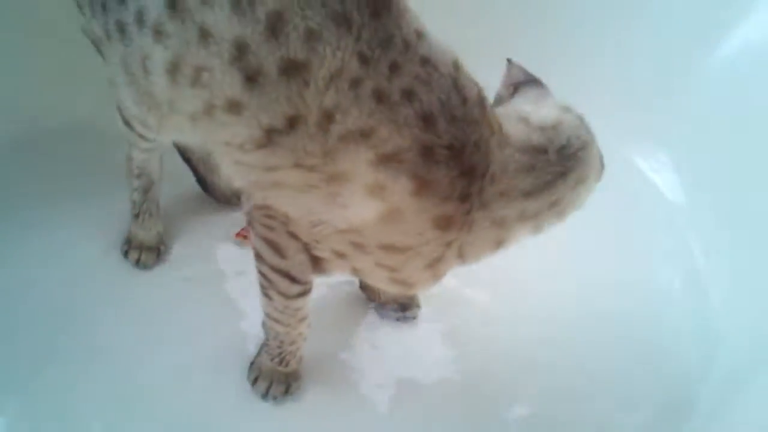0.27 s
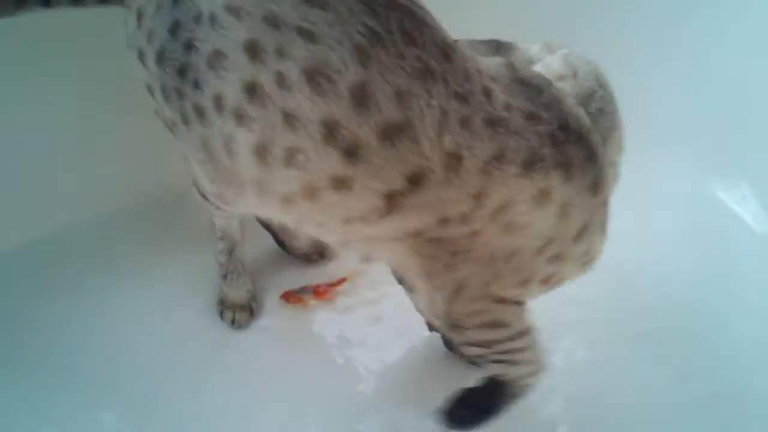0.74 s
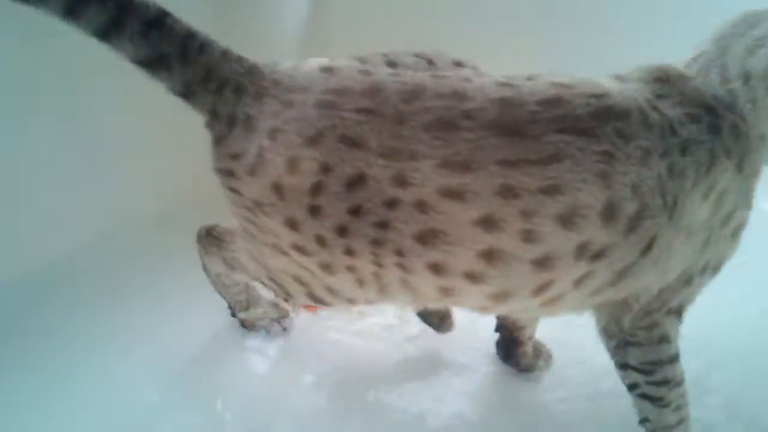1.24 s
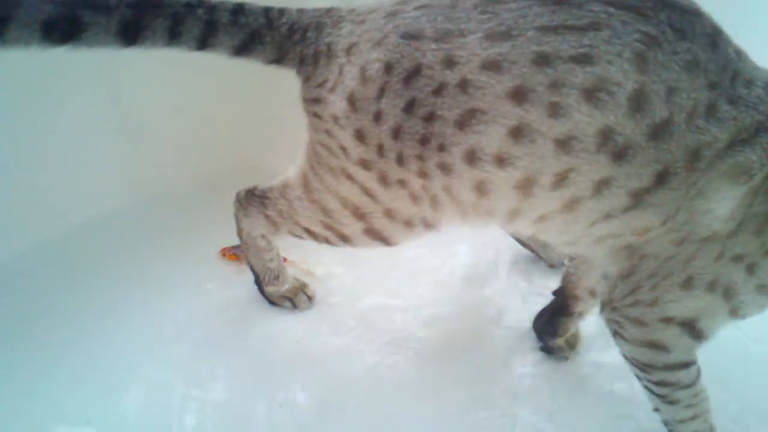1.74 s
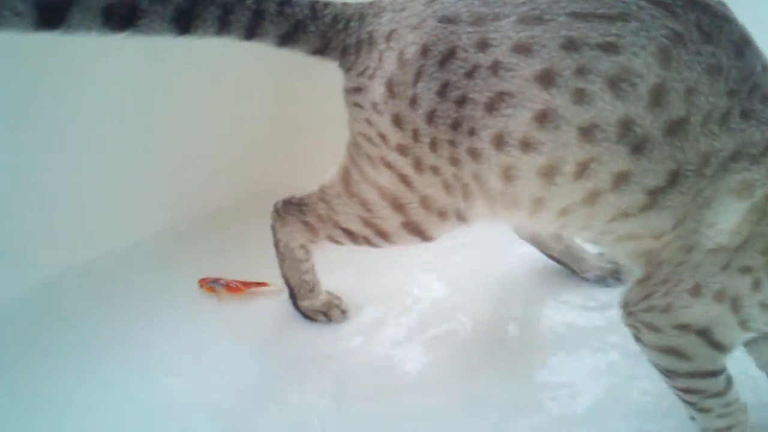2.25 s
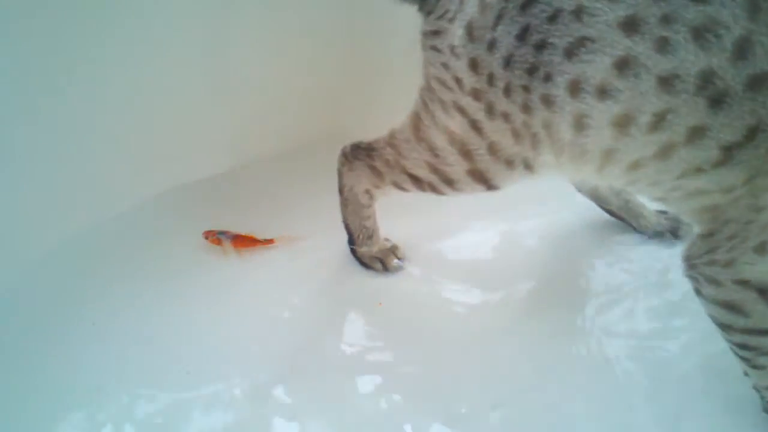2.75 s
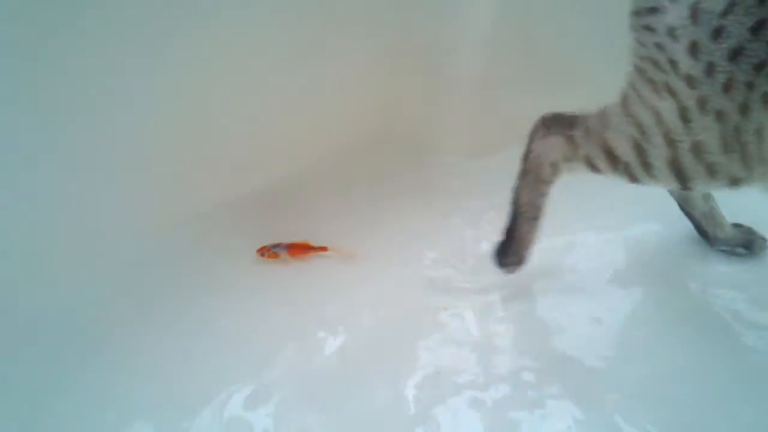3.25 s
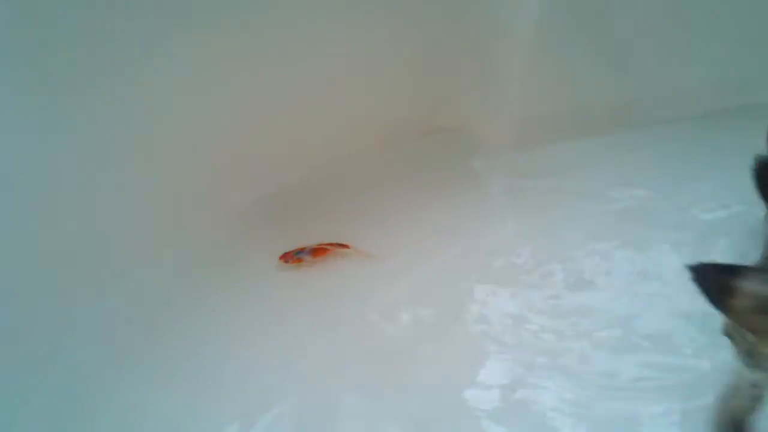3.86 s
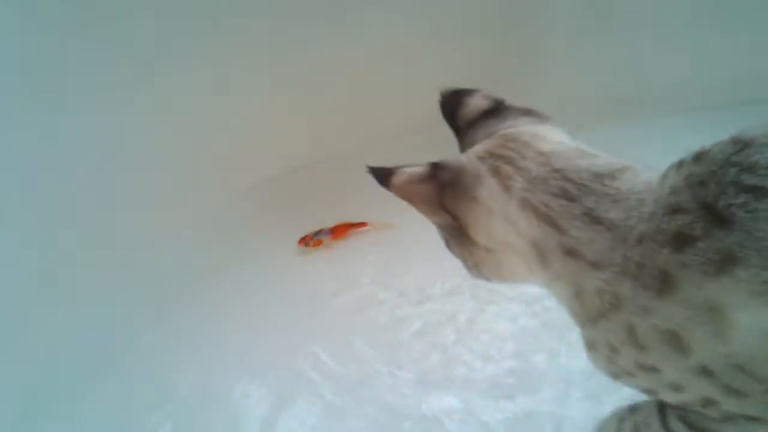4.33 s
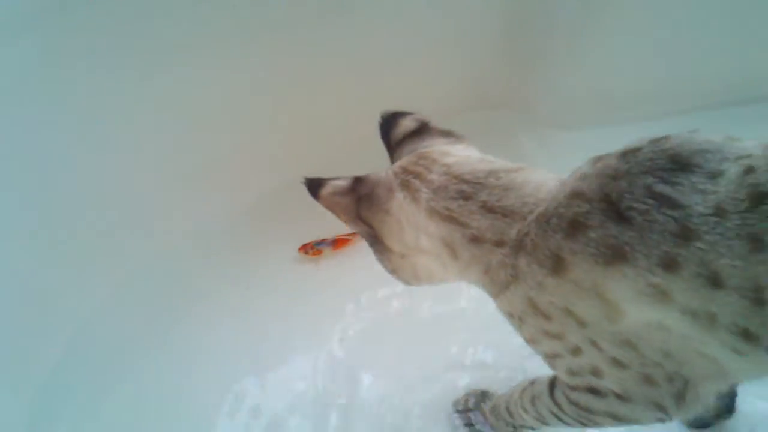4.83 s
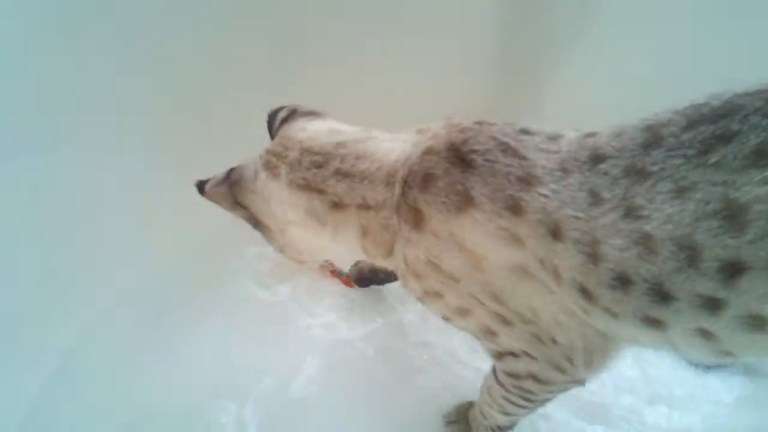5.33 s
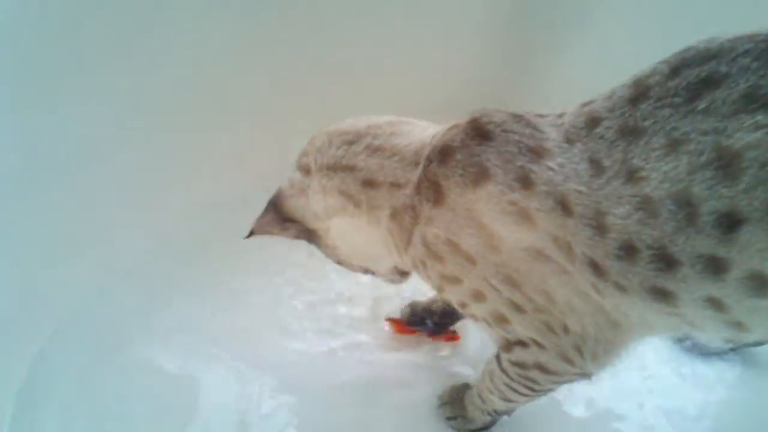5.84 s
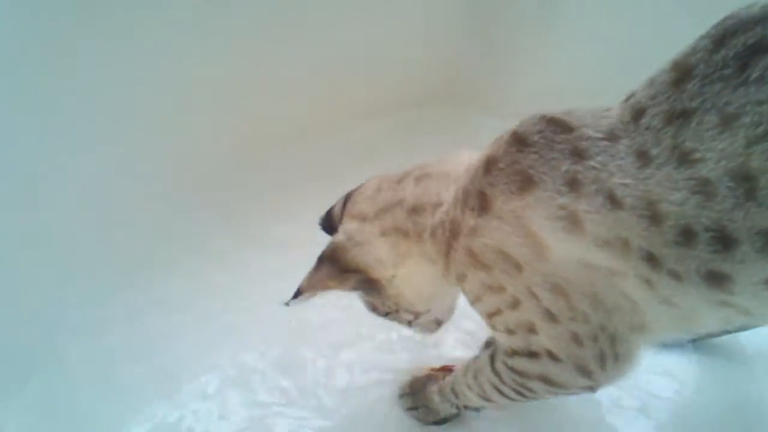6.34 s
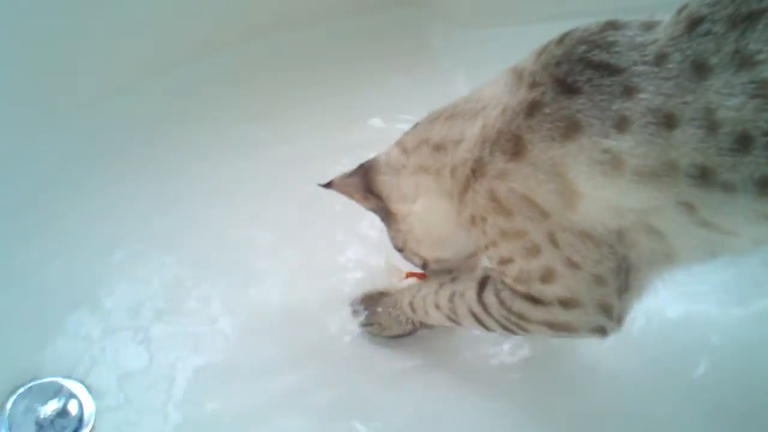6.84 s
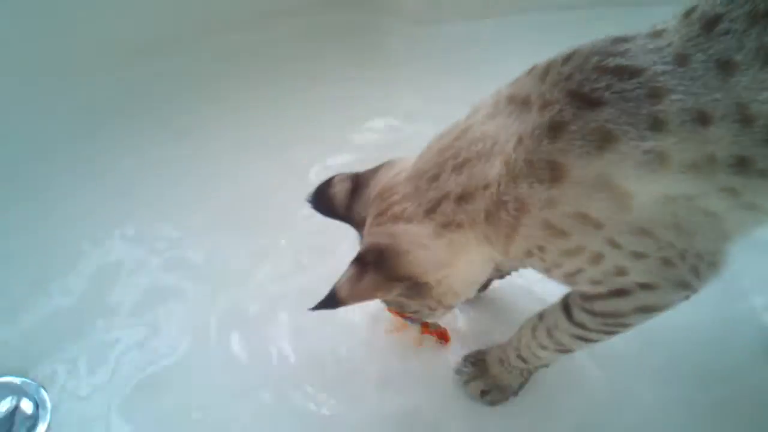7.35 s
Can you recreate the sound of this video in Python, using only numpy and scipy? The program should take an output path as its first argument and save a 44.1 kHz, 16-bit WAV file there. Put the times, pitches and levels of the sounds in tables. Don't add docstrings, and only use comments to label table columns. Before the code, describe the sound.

A cat steps through a finger of water in a bathtub, in a small echoing tiled bathroom with very soft rumble, hiss and fan hum. The first 0.9 seconds hold only faint low glugs and drips. From 0.9 to 1.5 comes the busiest splash: a wet push at 1.1, then loud hollow bubble pops around 1.2, with crisp spray and ticking drops at 1.35 and 1.45. It settles into gentle sloshing, with small drips and a light dab at 2.2 to 2.35. After a quiet gap, a little splash at 3.57 leads to plinks at 3.9, a sharp drop tick at 3.98 and a fuller slosh at 4.05, tapering through 4.4. Fine droplets patter around 5.2, then a clear plop rises in pitch at 5.4. Soft swishes follow at 5.7, 6.8 and 7.35. Water sits slightly left.

```python
import sys
import numpy as np
from scipy import signal
from scipy.fft import rfft, irfft, next_fast_len
from scipy.io import wavfile

SR = 44100
rng = np.random.default_rng(int(sys.argv[2]) if len(sys.argv) > 2 else 0)


def how_loud(loudness_db):
    steps = np.asarray(loudness_db, float) / 20
    return 10 ** steps


def store_wav(level_fs):
    pcm = np.round(np.clip(np.atleast_2d(level_fs), -1, 1) * 32767)
    wavfile.write(sys.argv[1], SR, pcm.T.astype(np.int16))


N = 334707


def noise(*shape):
    return rng.standard_normal(shape)


def band(x, lo_hz, hi_hz):
    sos = signal.butter(2, [lo_hz, min(hi_hz, SR / 2.2)], "band", fs=SR, output="sos")
    return signal.sosfilt(sos, x) * np.sqrt(SR / 2 / (hi_hz - lo_hz))


def sides(pan_db):
    return how_loud(np.array([[pan_db], [-pan_db]]) / 2)


def add(out, start_s, x):
    i = int(start_s * SR)
    out[:, i:i + x.shape[1]] += x[:, :N - i]


def ring(pitch_hz, cycles, glide, rise=0.39):
    turns = np.arange(int(5 * cycles * SR / pitch_hz) + 8) * pitch_hz / SR
    swell = (1 - np.exp(-turns / rise)) * np.exp(-2 * turns / cycles)
    return swell * np.sin(2 * np.pi * (turns + glide * turns ** 2 / (2 * cycles)))


# start_s, pitch_hz,
# peak_db, fade_ms
BUBBLES = [(0.146, 424, -50, 3), (.1465, 1000, -52, 1), (.1468, 1600, -55, 1), (.172, 350, -56, 5),
           (0.623, 450, -50, 2.5), (1.0962, 358, -52, 25), (5.399, 1480, -43, 9), (1.1975, 1133, -19.5, 2.6),
           (1.1998, 628, -42, 10), (1.2412, 975, -24.5, 2.5), (1.2646, 1116, -27, 3), (1.298, 1080, -39, 3.2),
           (1.3235, 1200, -38.5, 3.7), (1.3639, 440, -53, 5.7), (2.3244, 1240, -36, 2.35),
           (2.3327, 1176, -50, 12), (2.333, 850, -51, 5), (2.5634, 384, -51.5, 7.6), (2.975, 430, -64, 30),
           (3.9218, 1255, -41, 5.1), (4.024, 790, -42, 10), (4.0431, 590, -42, 12), (4.0445, 1220, -50, 2.1),
           (4.0546, 325, -33, 16), (4.0971, 350, -45.5, 29), (4.2299, 1190, -41, 2.5),
           (4.2308, 944, -44, 10.5), (4.4833, 1100, -47, 6.6), (4.546, 1098, -60, 8),
           (5.3074, 1217, -58.5, 24), (6.8114, 733, -45, 3.4), (6.8502, 734, -53, 4.5), (7.376, 680, -54, 1),
           (1.166, 1120, -50, 1.5), (1.183, 1050, -38, 1), (1.227, 1150, -33, 3), (1.311, 1150, -38, 2.5),
           (2.35, 1160, -58.5, 45), (2.334, 720, -54, 8), (3.575, 820, -52, 2), (4.12, 320, -46, 8),
           (4.235, 700, -60, 20), (4.308, 950, -59, 25), (4.325, 720, -52, 9), (6.817, 330, -52, 5)]
# start_s, pitch_hz, peak_db,
# fade_ms
MORE_BUBBLES = [(0.824, 1920, -57, 3.1), (0.9037, 2140, -49, 2.2), (1.0044, 1370, -48, 2.6),
                (1.0837, 1870, -45.5, 4.1), (1.173, 1560, -44, 2.3), (1.1915, 1500, -33, 2),
                (1.195, 1550, -26, 3), (1.222, 1520, -31, 3), (1.2099, 1560, -28.5, 6.2), (1.246, 1900, -25, 1.7),
                (1.4096, 1790, -51, 10), (1.5598, 2200, -54, 4.1), (2.321, 1840, -45, 1.1),
                (3.3719, 1825, -46, 4.8), (3.8217, 1450, -43.5, 1.4), (3.878, 1670, -58, 5.5),
                (3.9134, 1634, -36.5, 4), (3.9451, 1290, -46, 14), (4.029, 1760, -55, 6.9),
                (4.1035, 1900, -44, 2), (4.1072, 2150, -38, 2.8), (4.3676, 2200, -47.5, 12),
                (4.3789, 1310, -51, 4.8), (1.097, 1850, -47, 2.5), (4.9638, 2180, -56, 2.9),
                (5.1033, 1980, -50, 2), (5.236, 1590, -48, 2.2), (5.27, 1450, -49, 2), (6.798, 1546, -49.5, 7.2),
                (6.8259, 1530, -58, 11), (6.872, 1264, -55, 5.4), (6.8739, 1530, -50.5, 4.2),
                (6.904, 1640, -54, 22),
                (5.272, 4000, -60, 14), (5.232, 3250, -56, 8), (0.801, 3140, -56, 2.5), (1.105, 4000, -46, 3.5),
                 (1.5611, 2870, -53, 2.1), (2.2472, 4170, -56, 2.7), (2.2821, 3100, -57, 4.4),
                 (2.3229, 3600, -52, 1.5), (3.5567, 3410, -54, 2.4), (3.9053, 3140, -49, 1.5),
                 (4.103, 3920, -50, 3.3), (5.1086, 4000, -58, 2.5), (7.1272, 3840, -63, 3.1)]
# start_s, pitch_hz, peak_db, left_minus_right_db
SPECKS = [(0.9298, 3340, -52, 15), (0.958, 3200, -52.5, 17), (1.0015, 3500, -46, 6),
          (1.0984, 4200, -35.5, 4), (1.0986, 3480, -32, 8), (1.2033, 2800, -33, 8), (1.3462, 3300, -40, 15),
          (1.3713, 4380, -49, 6), (1.439, 2440, -38, 6), (1.4505, 3400, -44, 8), (2.1354, 3350, -53, 13),
          (2.2264, 4000, -49, 5), (2.227, 3020, -48, 18), (3.3774, 2380, -47.5, 14),
          (3.4562, 3010, -52, 17.5), (3.5733, 2670, -44, 11.5), (3.8561, 2640, -50, 13),
          (3.9072, 2400, -41, 6), (3.9845, 4320, -40, 21.5), (4.0765, 3140, -38.5, 14),
          (4.0766, 2440, -31, 6), (4.0764, 3960, -39, 13), (4.2389, 3710, -46, 13), (4.297, 3750, -46, 3),
          (4.3777, 3580, -51, 9), (5.2055, 3990, -49, 6), (5.2203, 3300, -43, 9), (5.268, 4470, -46, 5),
          (5.4015, 3150, -39, 3), (6.8742, 2430, -46, 9), (1.106, 3300, -42, 8), (1.118, 3700, -43, 8),
          (1.131, 4000, -44, 8), (2.247, 3600, -55, 8), (2.287, 3700, -56, 8), (2.3232, 3100, -54, 8),
          (2.3232, 4400, -56, 8), (3.8808, 3360, -54, 8), (3.8908, 3840, -52, 8), (3.9037, 4110, -50, 8),
          (3.9107, 4110, -48, 8), (4.3382, 3840, -53, 8), (5.391, 3200, -48, 6), (5.41, 3300, -46, 6)]


def bubbles():
    bubble_pan_db, more_bubble_pan_db, speck_fade_ms = 5.5, 8, 1.9
    rows = [(*row, bubble_pan_db) for row in BUBBLES]
    rows += [(*row, more_bubble_pan_db) for row in MORE_BUBBLES]
    rows += [(s, hz, db, speck_fade_ms, pan_db) for s, hz, db, pan_db in SPECKS]
    out = np.zeros((2, N))
    for start_s, pitch_hz, peak_db, fade_ms, pan_db in rows:
        cycles = max(fade_ms, 1) * pitch_hz / 500
        tone = ring(0.985 * pitch_hz, cycles, glide=0.06 * rng.random())
        add(out, start_s - 0.0012, how_loud(peak_db - 2.5) * sides(pan_db) * tone)
    return out


# start_s, pitch_hz, level_db
PLOP = [
    (5.3905, 570, -48),
    (5.391, 590, -26.5),
    (5.401, 627, -29.5),
    (5.41, 740, -26),
    (5.418, 860, -23.5),
    (5.427, 1008, -33.5),
    (5.438, 1190, -32.5),
    (5.441, 1250, -61),
]


def plop():
    pan_db, overtone_db = 4, -31
    start_s, pitch_hz, level_db = np.transpose(PLOP)
    t = np.arange(start_s[0], start_s[-1], 1 / SR)
    phase = 2 * np.pi * np.cumsum(np.interp(t, start_s, pitch_hz)) / SR
    tone = np.sin(phase) + how_loud(overtone_db) * np.sin(2 * phase)
    out = np.zeros((2, N))
    add(out, start_s[0], sides(pan_db) * how_loud(np.interp(t, start_s, level_db)) * tone)
    return out


def stroke(start_s, level_db, rise_s, fall_s):
    t = np.arange(0, N / SR, 0.001) - start_s
    return how_loud(level_db + 20 * np.minimum(t / rise_s, -t / fall_s))


def per_sample(levels):
    ms = np.arange(N) / SR * 1000
    return [np.interp(ms, np.arange(len(level)), level) for level in levels]


def grains(rate, spread_db, pitches_hz, cycles, patchy_db):
    out = 0
    knots = np.arange(0, N, 600)
    for pitch_hz in pitches_hz:
        place, size = rng.random((2, int(2 * rate * N / SR)))
        kicks = np.zeros(2 * N)
        kicks[(place * 2 * N).astype(int)] = how_loud(spread_db * np.minimum(-np.log(size), 3))
        clumps = np.interp(np.arange(N), knots, noise(len(knots)))
        kicks = kicks.reshape(2, N) * how_loud(patchy_db * clumps)
        rung = signal.oaconvolve(kicks, ring(pitch_hz, cycles, 0.19)[None], axes=1)[:, :N]
        out = out + rung * np.sqrt(pitch_hz)
    return out / np.std(out)


# start_s (moment of the peak), spray_db, rise_s, fall_s, fizz_over_spray_db (times per
# 20 dB)
FLINGS = [(0.006, -82, .005, 1.2, 10), (0.922, -65, .15, .3, 2.5), (1.0, -59, .02, .09, 3),
          (1.098, -58, .01, .3, 7), (1.208, -51, .05, .2, -6.5), (1.346, -51, .004, .25, -8),
          (1.445, -58, .05, .07, -4), (2.14, -71, .08, .1, .3), (2.234, -61, .05, .2, -8),
          (2.29, -66, .04, .1, 4), (3.57, -85, .02, .1, 8), (3.905, -58, .07, .15, 5),
          (3.984, -50, .012, .03, -1.5), (4.07, -51, .12, .14, -6), (4.23, -69, .02, .2, 4),
          (4.314, -61, .2, .2, -9), (4.975, -66, .06, .2, .5), (5.262, -57.5, .14, .25, -3.5),
          (5.404, -61, .03, .2, 1.5), (5.734, -68, .14, .13, -8), (6.818, -62, .03, .25, -12),
          (7.354, -69, .03, .07, -12)]
# start_s (moment of the peak), surge_db, fall_s (per 20 dB), slosh_over_surge_db
SHOVES = [(0.006, -73, 1.3, 5), (0.12, -76, .2, 24), (0.69, -72, .15, 5), (0.92, -74, .1, 9),
          (1.0, -66, .08, 18), (1.094, -52.5, .12, -1.5), (1.186, -66, .05, 38), (1.208, -51, .16, 24),
          (1.342, -58, .17, 21), (1.55, -68, .3, 7), (1.7, -74, .4, 17), (2.1, -84, .8, 22),
          (2.325, -65, .15, 14), (3.572, -64, .12, 14), (3.895, -60, .1, 10), (3.982, -64, .04, 9),
          (4.048, -48.5, .14, 9), (4.23, -70, .3, 17), (4.314, -65.5, .14, 8), (4.12, -68, .15, 21),
          (4.72, -68, .2, 14), (4.85, -66, .15, 11), (4.97, -76, .5, 15), (5.272, -76, .08, 29),
          (5.404, -51, .08, 21), (5.734, -71, .1, -8), (6.818, -62, .13, -2.5), (7.374, -71, .08, -2.5)]


def wading():
    flung = shoved = 0
    for start_s, spray_db, rise_s, fall_s, fizz_db in FLINGS:
        flung = flung + stroke(start_s, spray_db, rise_s, fall_s) * how_loud(np.array([[0], [fizz_db]]))
    for start_s, surge_db, fall_s, slosh_db in SHOVES:
        shoved = shoved + stroke(start_s, surge_db, 0.04, fall_s) * how_loud(np.array([[0], [slosh_db]]))
    spray_level, fizz_level = per_sample(flung)
    surge_level, slosh_level = per_sample(shoved)

    spray = grains(500, 3.8, np.geomspace(6200, 13500, 6), cycles=1.6, patchy_db=5)
    fizz = grains(400, 3.7, np.geomspace(2100, 4600, 6), cycles=3.8, patchy_db=4)
    slosh = grains(30, 3.9, np.geomspace(450, 1700, 7), cycles=7.6, patchy_db=1.5)
    surge = band(noise(N), 125, 440)
    mix = how_loud(-4) * spray_level * spray
    mix += how_loud(-5.5) * fizz_level * fizz
    mix += how_loud(-23) * slosh_level * slosh
    return sides(4.8) * mix + how_loud(-0.7) * surge_level * surge


# start_s, peak_db, pitch_hz, left_minus_right_db
DROPS = [(0.8825, -44, 8500, 15), (1.0009, -40, 4530, 5), (1.0043, -36, 9160, 16), (1.0972, -31, 8900, 14),
         (1.1952, -38.5, 8700, 19), (1.3448, -31.5, 8600, 10.5), (1.56, -55, 6570, 13),
         (2.1956, -51, 10600, 10), (2.1968, -44, 9260, 11), (2.2273, -43, 9700, 10), (2.2362, -44, 6370, 7),
         (2.247, -42.5, 7200, -1), (3.5646, -41.5, 11400, 12), (3.891, -51, 8990, 11),
         (3.983, -25.5, 7000, 3.5), (4.23, -53, 5900, 10), (4.2643, -45.5, 8700, 7), (5.1607, -48, 8600, 9),
         (5.1712, -45, 11300, 13), (5.2055, -48, 9140, 12), (5.224, -49, 6400, 16), (5.256, -40, 9170, 7),
         (5.267, -40.5, 11000, 7), (5.28, -46, 8510, 7), (5.3904, -47, 11700, 7), (5.3966, -43.5, 8400, 9),
         (5.451, -55, 8340, 12), (5.583, -44, 9300, 5), (6.8207, -43, 11800, 10), (7.3525, -56, 10900, 8),
         (1.0995, -37, 12500, 12), (1.1115, -42, 9200, 12), (1.187, -45, 8940, 12), (1.2, -42, 13000, 10),
         (1.3445, -41, 5800, 10), (3.8808, -54, 9100, 10), (3.9292, -52, 8360, 10), (.8827, -47, 12500, 12),
         (.8827, -50, 5800, 12), (2.1965, -46, 13000, 10), (2.1968, -50, 6000, 10), (6.8207, -46, 8500, 10),
         (3.9828, -35, 11500, 6), (4.2645, -52, 12000, 8), (4.342, -52, 9400, 8), (5.166, -53, 8800, 9),
         (5.2105, -50, 9300, 10), (5.2335, -52, 6200, 10), (5.2555, -45, 12800, 8), (5.2668, -46, 6600, 8),
         (5.3134, -50, 10900, 9), (5.325, -55, 9000, 9), (5.391, -52, 6000, 7), (5.402, -50, 8300, 8)]


def drops():
    out, t = np.zeros((2, N)), np.arange(600) / SR
    for start_s, peak_db, pitch_hz, pan_db in DROPS:
        tick = band(noise(600) * np.exp(-t / 0.0015), 0.62 * pitch_hz, 1.5 * pitch_hz)
        burst = band(noise(600) * np.exp(-t / 0.0027), 0.8 * pitch_hz, 1.17 * pitch_hz)
        add(out, start_s, how_loud(peak_db - 5.2) * sides(pan_db) * (tick + how_loud(-3) * burst))
    return out


# middle_s, centre_hz, length_s, rms_db
PUFFS = [(.375, 3500, .04, -66), (.37, 4200, .035, -68), (1.135, 3700, .07, -55), (4.3, 7000, .05, -65),
         (5.218, 9500, .05, -63), (1.2, 12500, .025, -52), (3.95, 11500, .05, -60),
         (0.779, 7640, 0.03, -63.5), (0.846, 9800, 0.032, -59.5), (0.916, 8200, 0.035, -57),
         (1.201, 8700, 0.038, -46.5), (1.356, 11000, 0.03, -44.5), (1.449, 10000, 0.038, -49.5),
         (1.587, 7200, .05, -66), (2.266, 10200, 0.042, -58.5), (3.6, 11000, 0.057, -68),
         (4.335, 10000, .04, -56.5), (3.46, 7800, .05, -69.5), (4.074, 11400, .1, -61),
         (4.302, 7740, .09, -62.5), (4.473, 7240, .08, -65.5), (4.846, 11800, .04, -64),
         (4.98, 10200, 0.052, -62.5), (5.539, 10300, 0.035, -61), (5.722, 10000, 0.057, -68)]


def puffs():
    out = np.zeros((2, N))
    for middle_s, centre_hz, length_s, rms_db in PUFFS:
        swell = np.hanning(int(1.4 * length_s * SR))
        hiss = band(noise(2, len(swell)), 0.87 * centre_hz, 1.133 * centre_hz)
        add(out, middle_s - 0.65 * length_s, how_loud(rms_db - 1.5) * sides(2.7) * swell * hiss)
    return out


# centre_hz, t60_s, level_db
ROOM = [
    (197, 0.22, -2),
    (756, 0.46, -7),
    (1500, 0.51, -3.8),
    (4300, 0.3, -5.5),
    (10000, 0.32, -8),
]
# late_s, level_db
TUB = [
    (.0042, -13),
    (0.01, -11),
    (.017, -19),
    (.0205, -11.5),
    (.024, -21),
    (.034, -15),
]


def room(x):
    t = np.arange(int(0.7 * SR)) / SR
    tail = 0
    for centre_hz, t60_s, level_db in ROOM:
        fade = how_loud(-60 * t / t60_s) * (1 - np.exp(-t / 0.014))
        unit_energy = np.sqrt(1.52 * centre_hz / SR / np.sum(fade ** 2))
        hiss = band(noise(2, len(t)), centre_hz / 1.6, centre_hz * 1.53)
        tail = tail + how_loud(level_db) * hiss * fade * unit_energy
    echoes = np.zeros_like(tail)
    for late_s, level_db in TUB:
        echoes[:, int(late_s * SR)] = how_loud(level_db) * sides(5.3)[:, 0]
    tail += signal.sosfilt(signal.butter(1, 4500, fs=SR, output="sos"), echoes)
    return signal.fftconvolve(x.mean(0)[None], tail, axes=1)[:, :N]


# pitch_hz, level_db (per Hz)
AIR = [(6, -35), (12, -22), (22, -17), (36, -35), (100, -9), (200, -8), (400, -14), (900, -23), (2000, -27),
       (4000, -32.5), (5500, -36), (9000, -28.5), (13500, -29.5)]
# pitch_hz, rms_db
FAN = [
    (93.3, -91.5),
    (186.6, -80),
    (241, -74.5),
    (280, -79.5),
    (373, -80),
]


def air():
    pitch_hz, level_db = np.transpose(AIR)
    f = np.fft.rfftfreq(N, 1 / SR) + 1
    shape = how_loud(np.interp(np.log(f), np.log(pitch_hz), level_db))
    bed = irfft(rfft(noise(2, N)) * shape, N)
    bed *= how_loud(-64) / np.std(bed)
    for pitch_hz, rms_db in FAN:
        bed += how_loud(rms_db) * band(noise(2, N), pitch_hz - 5, pitch_hz + 5)
    return bed


def scene():
    water = bubbles() + drops() + puffs() + wading() + plop()
    right_late_s = 0.00019
    size = next_fast_len(N)
    late = np.exp(-2j * np.pi * np.fft.rfftfreq(size, 1 / SR) * right_late_s)
    right = irfft(rfft(water[1], size) * late, size)[:N]
    direct = np.array([water[0], right])
    return direct + room(water) + air()


def roll_off(x):
    return signal.sosfilt(signal.butter(12, 14940, fs=SR, output="sos"), x)


def record(dry):
    lag = 17
    crossed = np.pad(dry, ((0, 0), (lag, 0)))[::-1, :N]
    f, _, frames = signal.stft(dry - crossed, SR, nperseg=128)
    blur_rad = 0.97 * np.interp(f, [3800, 5300], [0, 1])[:, None]
    frames *= np.exp(1j * blur_rad * noise(*frames.shape))
    blurred = signal.istft(frames, SR)[1][:, :N]
    low_pass = signal.ellip(10, 0.2, 70, 13900, fs=SR, output="sos")
    return roll_off(signal.sosfilt(low_pass, blurred))


dry = scene()
out = record(dry)
store_wav(out)
```